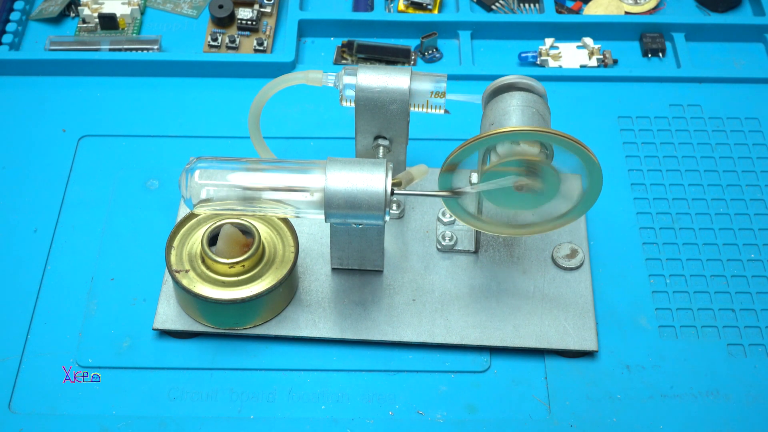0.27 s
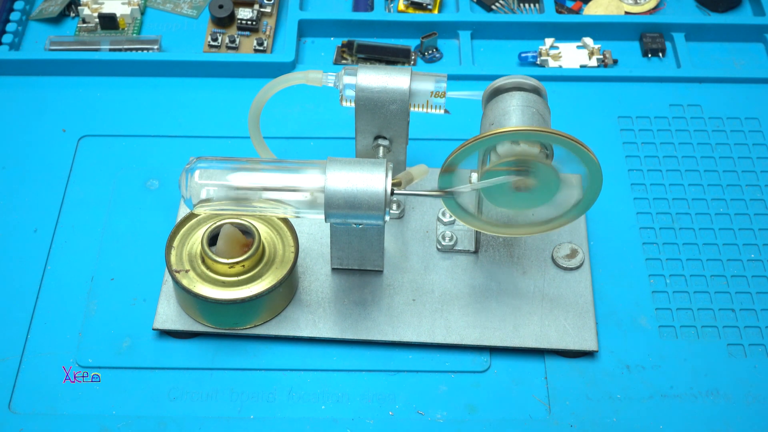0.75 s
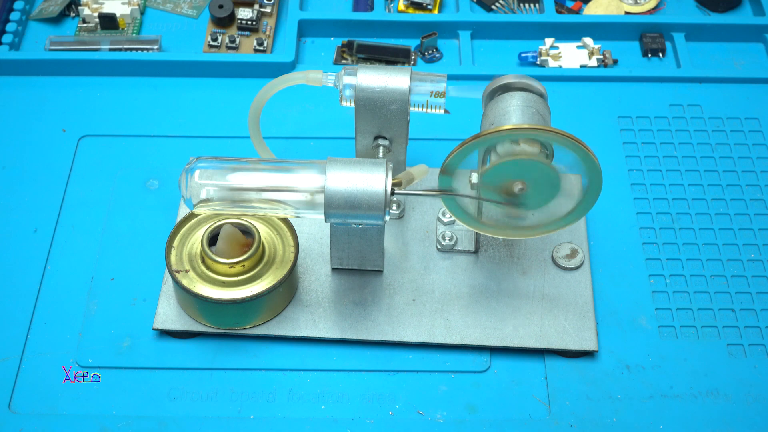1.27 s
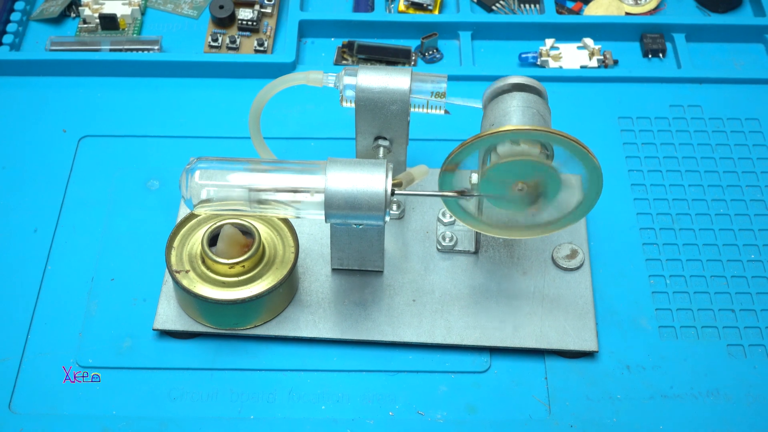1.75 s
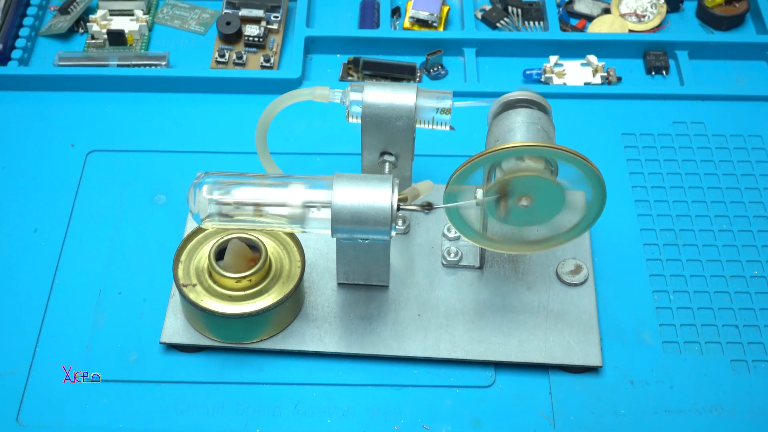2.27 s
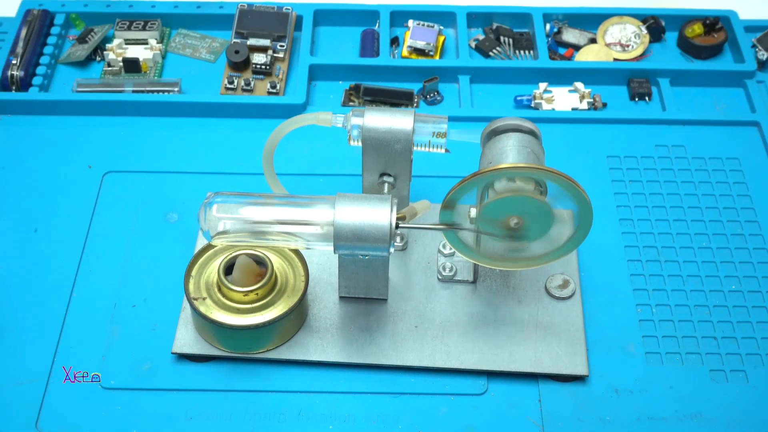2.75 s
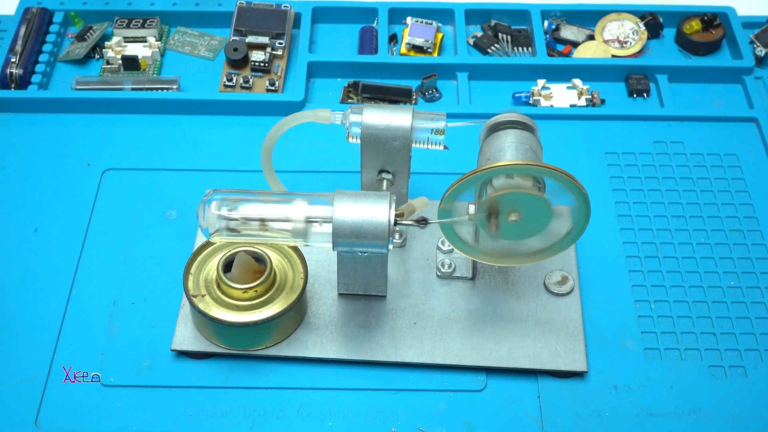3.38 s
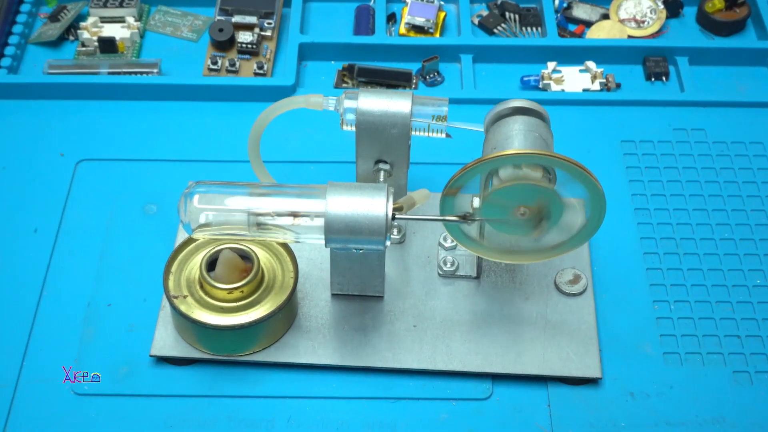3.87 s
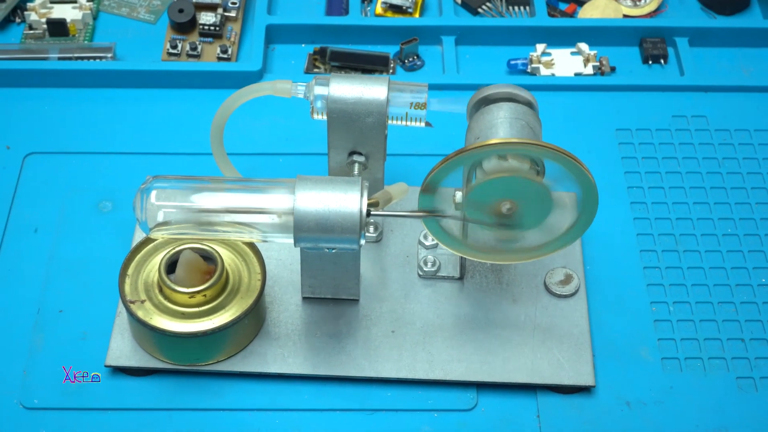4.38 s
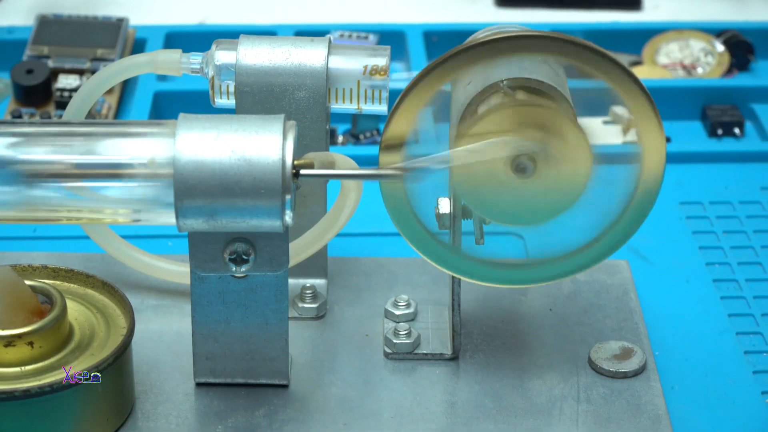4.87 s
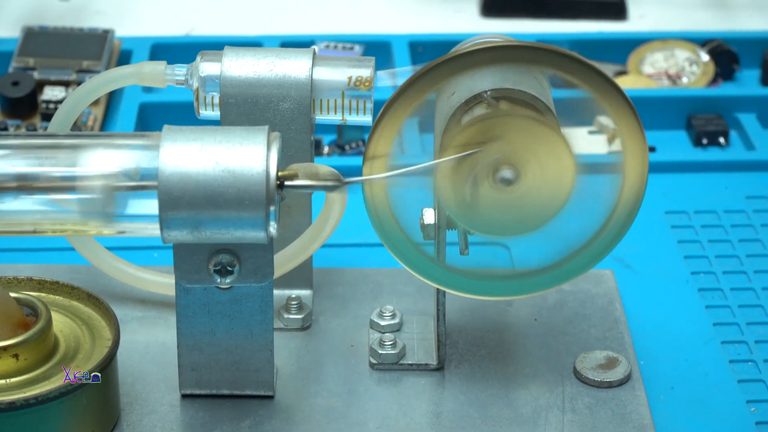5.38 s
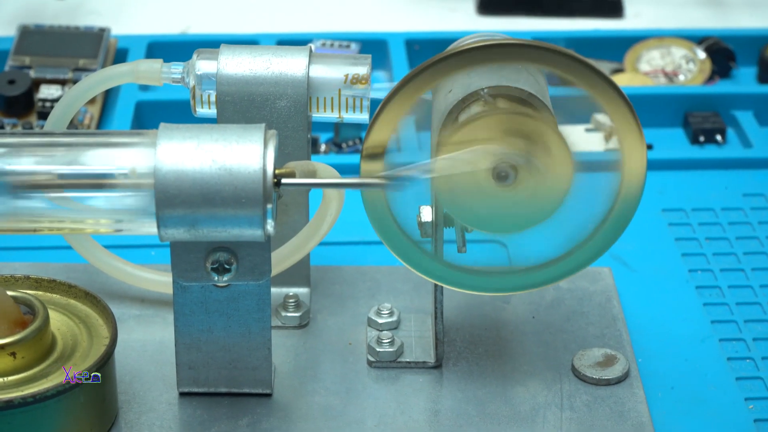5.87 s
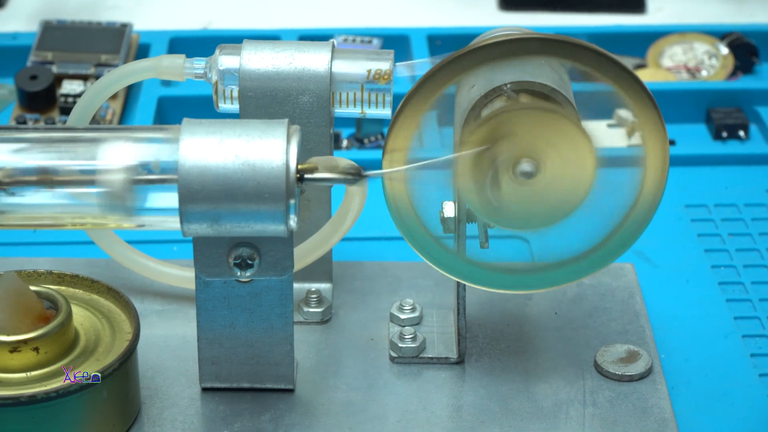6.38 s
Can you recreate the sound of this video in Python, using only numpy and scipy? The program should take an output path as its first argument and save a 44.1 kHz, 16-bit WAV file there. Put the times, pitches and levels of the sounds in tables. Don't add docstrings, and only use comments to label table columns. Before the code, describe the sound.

Rapid steady clatter of a tiny piston engine, one deep bump near two seconds, then a cut to quicker, sharper, louder metal ticking.

```python
import sys
import numpy as np
from scipy import signal
from scipy.fft import rfft, irfft, next_fast_len
from scipy.io import wavfile
from scipy.ndimage import uniform_filter1d, map_coordinates

SR = 44100
rng = np.random.default_rng(int(sys.argv[2]) if len(sys.argv) > 2 else 0)


def waveform_to_disk(signal):
    frames = np.transpose(np.atleast_2d(signal))
    scaled = np.clip(frames, -1, 1) * 32767
    samples = np.round(scaled).astype(np.int16)
    wavfile.write(sys.argv[1], SR, samples)


def ratio_of_db(decibels):
    return 10 ** (np.asarray(decibels, float) / 20)


N = 292383
T = np.arange(N) / SR
CHANGE_S = 4.5755

# (frequency [Hz], level per Hz [dB])
ROOM_FAR = [(25, -57), (55, -48), (85, 3.5), (140, -11.5), (270, -10.5), (360, -4), (430, -4.5), (495, -3),
            (560, -26.5), (720, -15.5), (1400, -22), (4000, -15), (12500, -38), (16000, -44)]
ROOM_NEAR = [(25, -21), (85, 0), (250, -17.5), (300, -9), (365, -1), (440, -6.5), (495, -3), (560, -23),
             (715, -8.5), (800, -12), (1400, -16), (4000, -14), (12500, -28.5), (16000, -57)]
# (frequency [Hz], level [dB])
WHIR = [(400, 2), (1500, 9), (1950, 11), (2600, 8.5), (3100, 8.5), (3800, -0.5), (5600, -17.5), (8600, -5),
        (9800, -17), (11000, -13), (16000, -54)]
# (share of a turn after the knock [0-1], level
# [dB])
SLIDE = [(0, 12), (.15, 0.5), (.3, 0.5), (.38, 4), (.55, 12), (.72, -2), (.8, -2.5), (.9, 6.5), (1, -1.5)]

# (time [s], speed [turns/s])
SPEED_FAR = [(0, 8.451), (.9, 8.506), (1.6, 8.7), (2.5, 8.902), (3.2, 8.979), (4.58, 9.463)]
SPEED_NEAR = [(4.58, 11.874), (5.3, 11.868), (5.6, 12.052), (6.63, 12.065)]
START_FAR, START_NEAR = -.453, -.841

# (place after the clank [turns], scatter [ms], chance a turn [0-1])
TIMING_FAR = dict(clank=(0, .2, 1), back=(.29, 2, .7), slap=(.342, 1, .4), knock=(.455, .25, 1),
              pin=(.825, 2.2, 1), rub=(.912, 1, 1))
TIMING_NEAR = dict(clank=(-.006, .3, 1), slap=(.275, 2, 1), knock=(.464, .4, 1))
# (peak level [dB], scatter [dB])
FORCE_FAR = dict(clank=(-15, 0.3), back=(-37, 4.5), slap=(-30.5, 3), knock=(-16.5, 0.13), pin=(-43.5, 1.5),
             rub=(-23, 3))
FORCE_NEAR = dict(clank=(-16, 0.6), slap=(-23.5, 3.9), knock=(-17.5, 0.23))
HARD_PINS = [.03, .98, 1.09, 1.21, 1.33, 1.56, 1.9, 2.13, 2.35, 2.58, 3.14, 3.25, 3.36, 4.13, 4.24]
HARD_RUBS = [1.45, 2.81, 3.04, 3.48, 3.7]
HARD_SLAPS = [.68, 1.39, 1.62, 1.73, 1.96, 2.64, 3.2, 3.52, 3.74, 3.96, 4.07, 4.17, 4.28]
# (time [s], peak level [dB])
PINS = [(4.6361, -11), (4.7228, -7), (4.806, -10), (4.8916, -9), (4.9715, -11), (5.0573, -10.5),
        (5.1387, -19.5), (5.2233, -11.0), (5.3113, -10.5), (5.3959, -8), (5.4792, -9), (5.5635, -8),
        (5.6477, -8.5), (5.7276, -7), (5.8123, -7), (5.8897, -16.5), (5.9724, -18), (6.0578, -8.5),
        (6.1448, -6.5), (6.2241, -10.5), (6.309, -9), (6.3935, -6), (6.4738, -10), (6.5592, -8)]
# (time [s], peak level [dB])
BACKS = [(4.6754, -20), (4.7615, -21), (5.0143, -19.5), (5.097, -20.5), (5.1826, -26.5), (5.2669, -18.5),
         (5.6856, -19), (5.8503, -16.5), (5.9326, -21.5), (6.0161, -20), (6.1824, -12.5), (6.2638, -23.5),
         (6.4318, -17), (6.5978, -15.5)]
CUSHION_MS = [.9, .9, 1.7, 1.4]

# (frequency [Hz], level [dB], time to fall 60 dB [ms])
PISTON_FAR = [(714, -23.5, 52), (1879, -7, 36), (2120, -3, 20.4), (2980, -14.5, 31), (3752, 8, 13),
              (4240, 0.5, 10), (4730, -15.5, 37), (5150, -19.5, 61), (5420, -55.5, 6.7), (6610, -10.5, 12),
              (9400, -35, 7.4), (9630, -12, 13), (11560, -15.5, 12), (12700, -50, 15)]
PISTON_NEAR = [(681, -14, 40), (2020, -2.5, 26), (2233, -1.5, 24), (3330, -11, 14), (3664, -5, 45),
               (3950, 11, 10), (4430, 3.5, 20), (4980, 6, 7.6), (5340, 1.5, 14.2), (5760, 3, 15),
               (6550, -8, 8.7), (9700, -21, 6.7), (11700, -34, 15)]
BRACKET_FAR = [(724, -17, 48.5), (978, -12, 22), (1863, -3.5, 24.6), (2210, 10.5, 11.9), (2676, 5, 18.4),
               (3870, -7.5, 20), (5020, -12, 20), (6640, -10, 5.3), (6940, -9, 10.4), (7270, -10.5, 19.5),
               (9800, -17, 12), (12290, -6, 9.6)]
BRACKET_NEAR = [(704, -7.5, 20), (2180, 14.5, 11.5), (2554, -2, 28), (3440, -7, 19), (5300, -18, 27),
                (7300, -13, 20), (12400, -30, 12)]
PIN = [(1184, 5, 7.1), (1823, -0.5, 37.6), (1992, -2, 54), (2470, -19, 134), (3302, -1, 42), (3990, -2, 34),
       (4870, 13, 4.3), (5900, -3, 18), (5944, -3, 39), (7300, -8, 8), (7960, -7, 38), (9740, 6, 18.3),
       (10140, 8, 8.5), (12200, -10, 17)]
ROD = [(1030, 8.5, 4), (1836, 8.5, 12.4), (1940, 7.5, 14.3), (2520, -13, 56), (3500, -10, 19)]
# (frequency [Hz], level [dB], time to fall 60 dB [ms])
PLATE = [(367.4, -18, 84), (497, -34.5, 255)]
# (frequency [Hz], level [dB])
PIN_FAR = [(1000, 26.5), (2000, 8), (4000, 11.5), (6000, 13), (8000, -24), (10000, 1), (14000, 12)]
# (frequency [Hz], time to fall 60 dB [s])
TAIL = [(300, 0.037), (2000, 0.082), (5000, 0.12), (12000, 0.12)]

# (middle [s], half length [s], sway level [dB], rumble level [dB])
GRIPS = [
    (1.727, 0.097, -31.5, -37.5),
    (1.873, 0.069, -21.5, -36.5),
    (1.986, 0.15, -20, -42),
    (2.467, .06, -31, -55),
    (2.704, .08, -34, -55),
    (3.02, 0.21, -34, -55),
    (3.916, 0.057, -30, -38),
    (4.055, 0.088, -29, -36.5),
    (4.324, 0.22, -26, -38.5),
    (4.506, 0.13, -32, -49),
]
# (time [s], frequency, signed by the push [Hz], level [dB], time to fall 60 dB [ms])
BUMPS = [(1.95, 140, -11.5, 26), (1.97, 174, -6, 38), (1.982, 126, -17, 99), (2.091, -130, -9, 19),
         (2.095, 320, -23, 61), (2.129, 816, -14.5, 23), (2.129, -560, -27.5, 34), (2.124, 89, -7.5, 250),
         (3.997, 114, -19.5, 32), (4.512, -260, -28.5, 75), (4.526, -92.5, -16.5, 133), (4.558, 48, -6, 25)]


def unit(x):
    return x / np.sqrt(np.mean(x ** 2) + 1e-20)


def along(points, hz):
    f, v = np.transpose(points)
    return np.interp(np.log(hz + 1), np.log(f + 1), v)


def wobble(rate):
    return map_coordinates(rng.standard_normal(int(N * rate / SR) + 4), [T * rate])


def noise(gain):
    m = next_fast_len(N + 8192)
    spectrum = rfft(rng.standard_normal(m)) * gain(np.fft.rfftfreq(m, 1 / SR))
    return unit(irfft(spectrum, m)[:N])


def room(spectrum, db):
    return ratio_of_db(db + 0.85 * wobble(4.74)) * noise(lambda hz: ratio_of_db(along(spectrum, hz)))


def crank(near):
    speed, start = (SPEED_NEAR, START_NEAR) if near else (SPEED_FAR, START_FAR)
    turns_per_s = np.interp(T, *np.transpose(speed)) * (T >= speed[0][0])
    return start + np.cumsum(turns_per_s) / SR


def whir(near, db, grit_db):
    timing = TIMING_NEAR if near else TIMING_FAR
    turn = (crank(near) - timing["knock"][0]) % 1
    stroke_db = np.interp(turn, *np.transpose(SLIDE))
    roughness_db = grit_db * np.tanh(wobble(300))
    return ratio_of_db(db + stroke_db + roughness_db) * noise(lambda hz: ratio_of_db(along(WHIR, hz)))


def contact(name, near, hard=(), hard_db=0, early=0):
    angle = crank(near)
    share, scatter_ms, chance = (TIMING_NEAR if near else TIMING_FAR)[name]
    db, scatter_db = (FORCE_NEAR if near else FORCE_FAR)[name]
    turns = np.arange(-1, 42) + share
    late, size = rng.standard_normal((2, len(turns)))
    fast = np.interp(turns, angle, T) > 3.47
    s = np.interp(turns - early * fast, angle, T, np.nan, np.nan) + scatter_ms * late / 1e3
    full = np.array([any(abs(v - h) < .04 for h in hard) for v in s])
    more_often = fast & (name in ("slap", "back"))
    lands = (rng.random(len(s)) < chance + more_often / 2) | full
    if near:
        inside = (s > CHANGE_S + .01) & (s < N / SR)
    else:
        inside = (s > 0) & (s < CHANGE_S)
    peak_db = db + np.where(full, hard_db + size, scatter_db * size)
    return np.transpose([s, peak_db])[lands & inside]


def strike(events, modes, db, rise_ms, loose, crack_db, crack_ms, chatter_db,
           gap=1.7, bounce_db=-12, crack_hz=9000):
    t = np.arange(3072) / SR
    hz, level_db, t60 = np.transpose(modes)[:, :, None]
    crack_band = signal.butter(2, [1400, crack_hz], "bandpass", fs=SR, output="sos")
    sign = (-1.) ** np.arange(len(modes))[:, None]
    bounce = np.round(np.array([4, 8, 14]) * gap * SR / 1e3).astype(int)
    build = 1 - np.exp(-t * hz / 1.38)
    out = np.zeros(N + 2 * len(t))
    for s, peak_db in events:
        size, tune, turn = rng.standard_normal((3, len(modes), 1))
        sines = sign * np.sin(2 * np.pi * hz * (1 + .004 * tune) * t + loose * turn)
        ring = np.sum(ratio_of_db(level_db + 0.67 * size - 74800.0 * t / t60) * build * sines, axis=0)
        crack = ratio_of_db(crack_db - 69300.0 * t / crack_ms) * rng.standard_normal(len(t))
        crack = signal.sosfilt(crack_band, crack)
        blow = (ring + crack) * (1 - np.exp(-1e3 * t / rise_ms)) ** 2

        chatter = ratio_of_db(chatter_db - 60 * t / 0.063) * rng.standard_normal(len(t))
        rebounds = chatter * (rng.random(len(t)) < .03)
        rebounds[0] = 1
        rebound_db = np.array([-9, -14, -18]) + bounce_db + 2.4 * rng.standard_normal(3)
        rebounds[bounce + rng.integers(0, 12, size=3)] = ratio_of_db(rebound_db)
        blow = signal.fftconvolve(blow, rebounds)

        peak = np.sqrt(np.max(uniform_filter1d(blow ** 2, size=30)))
        out[round(s * SR):][:len(blow)] += ratio_of_db(peak_db + db) * blow / peak
    return out[:N]


def far_linkage():
    far_pin = [(hz, db + along(PIN_FAR, hz), 0.47 * t60) for hz, db, t60 in PIN]
    bright_pin = [mode for mode in PIN if 9000 < mode[0] < 12000]
    knock = strike(contact("knock", False), PISTON_FAR + PLATE, db=-0.5, rise_ms=CUSHION_MS[0], loose=0.23,
                   crack_hz=6030, crack_db=0, crack_ms=17, chatter_db=-29, gap=1.0, bounce_db=-8.0)
    pin = strike(contact("pin", False, HARD_PINS, hard_db=6.5), far_pin, db=10.0, rise_ms=0.03, loose=0.92,
                 crack_db=6, crack_ms=14, chatter_db=-9.5)
    rub = strike(contact("rub", False, HARD_RUBS, hard_db=6), ROD, db=-3, rise_ms=0.29, loose=0.51,
                 crack_db=-19.0, crack_ms=16, chatter_db=-8.0)
    clank = strike(contact("clank", False), BRACKET_FAR + PLATE, db=-3.0, rise_ms=CUSHION_MS[1], loose=0.62,
                   crack_db=3.0, crack_ms=9.3, chatter_db=-21.0, gap=1.5, bounce_db=-4.0)
    slap = strike(contact("slap", False, HARD_SLAPS, hard_db=0, early=.05), ROD[:3], db=2.0, rise_ms=0.06,
                  loose=0.85, crack_db=-21, crack_ms=15, chatter_db=-9)
    back = strike(contact("back", False), bright_pin, db=-7.5, rise_ms=0.22, loose=0.42,
                  crack_db=-16, crack_ms=8, chatter_db=-11.5)
    return knock + pin + rub + clank + slap + back


def bench(x, db):
    out = np.zeros(N + SR)
    for start in range(0, N, SR // 8):
        hz, t, z = signal.stft(rng.standard_normal(SR // 4), SR, nperseg=256)
        fading = z * ratio_of_db(-60 * t / along(TAIL, hz)[:, None])
        tail = signal.istft(fading, SR, nperseg=256)[1]
        delayed = np.pad(x[start:start + SR // 8], (150, 0))
        answer = signal.fftconvolve(delayed, tail / np.linalg.norm(tail))
        out[start:start + len(answer)] += answer
    return x + ratio_of_db(db) * out[:N]


def grip():
    hold_db = np.select([T < 1.67, T < CHANGE_S], [-62, -42], -44)
    sway = ratio_of_db(hold_db + 1.5 * wobble(3.2))
    rumble = ratio_of_db(-50 + 2 * wobble(2))
    for s, half, sway_db, rumble_db in GRIPS:
        swell = np.cos(np.pi / 2 * np.clip((T - s) / half, -1, 1)) ** 2
        sway = np.maximum(sway, ratio_of_db(sway_db) * swell)
        rumble = np.maximum(rumble, ratio_of_db(rumble_db) * swell)
    return sway, rumble


def sway_and_rumble():
    sway_gain, rumble_gain = grip()
    phase = 2 * np.pi * np.cumsum(25 + 5 * wobble(16)) / SR
    sway = np.sqrt(2) * np.sin(phase) * ratio_of_db(0.47 * wobble(16))
    sway = 1.03 * sway + 0.17 * noise(lambda hz: hz / np.hypot(hz * hz - 24 ** 2, hz * 12))
    rumble = noise(lambda hz: (hz / 60) ** 2 / (1 + (hz / 60) ** 2) / (1 + (hz / 110) ** 4))
    free = np.abs(T - 2.25) > .17
    return sway_gain * sway * free + ratio_of_db(-2.5) * rumble_gain * rumble


def taps():
    out = np.zeros(N)
    for s, hz, db, t60 in BUMPS:
        t = np.maximum(T - s, 0)
        out += ratio_of_db(db - 66000.0 * t / t60) * (1 - np.exp(-t / 0.00099)) * np.sin(2 * np.pi * hz * t)
    return out


def hard_bump():
    t = np.maximum(T - 2.104, 0)
    turns = 23.2 * t + .74 * (1 - np.exp(-t / 0.0068))
    held = 0.58 * np.exp(-np.maximum(t - 0.13, 0) / .035)
    wider_first = 1 + .7 * np.exp(-(t / .055) ** 4)
    after_swing = 0.16 * np.exp(-(t / 0.34) ** 4)
    rise = 1 - np.exp(-t / 0.004)
    return -rise * (held * wider_first + after_swing) * np.cos(2 * np.pi * turns)


def near_linkage():
    knock = strike(contact("knock", True), PISTON_NEAR + PLATE, db=2.0, rise_ms=CUSHION_MS[3], loose=0.35,
                   crack_hz=6150, crack_db=7.5, crack_ms=17.4, chatter_db=-20, gap=.7, bounce_db=-7.5)
    pin = strike(PINS, PIN, db=-1.0, rise_ms=0.041, loose=0.56,
                 crack_db=8, crack_ms=14.4, chatter_db=-19.5, gap=0.84, bounce_db=-14.0)
    clank = strike(contact("clank", True), BRACKET_NEAR, db=-1, rise_ms=CUSHION_MS[2], loose=0.13,
                   crack_db=-16, crack_ms=12, chatter_db=-19)
    slap = strike(contact("slap", True), ROD, db=-1, rise_ms=0.26, loose=1.0,
                  crack_db=-33, crack_ms=21, chatter_db=-12.5)
    back = strike(BACKS, PIN, db=1.1, rise_ms=0.039, loose=0.2,
                  crack_db=0.5, crack_ms=5.2, chatter_db=-15.0)
    return knock + pin + clank + slap + back


def scene():
    far = room(ROOM_FAR, db=-46.5) + whir(False, db=-48.5, grit_db=6.0) + bench(far_linkage(), db=-13.5)
    handling = sway_and_rumble() + taps() + hard_bump()
    near = room(ROOM_NEAR, db=-38.0) + whir(True, db=-51.5, grit_db=14.5) + bench(near_linkage(), db=-14.5)
    fade_in = np.clip((T - CHANGE_S) / 0.016, 0, 1)
    is_far = T < CHANGE_S
    return (is_far * far + fade_in * near + np.where(is_far, 1, fade_in) * handling)[None]


def low_pass(x):
    return signal.sosfilt(signal.butter(12, 16490, fs=SR, output="sos"), x)


def record(dry):
    hiss = ratio_of_db(-64) * rng.standard_normal(dry.shape)
    lowpass = signal.ellip(8, 1, 45, 15800, fs=SR, output="sos")
    mix = np.clip(signal.sosfilt(lowpass, dry + hiss), -1, 1)
    return low_pass(mix)


dry = scene()
out = record(dry)
waveform_to_disk(out)
```